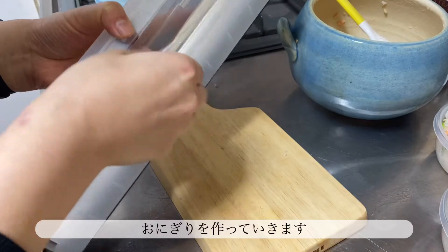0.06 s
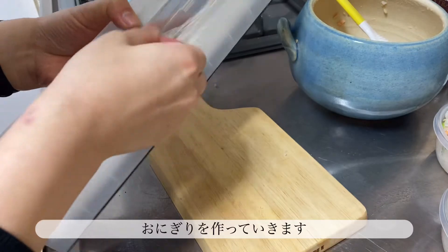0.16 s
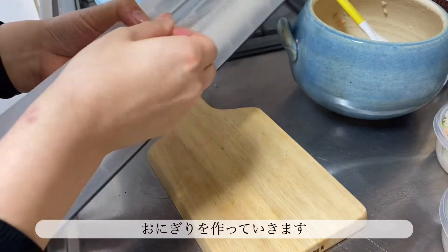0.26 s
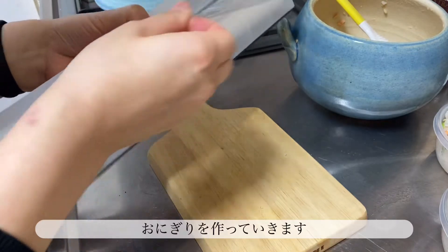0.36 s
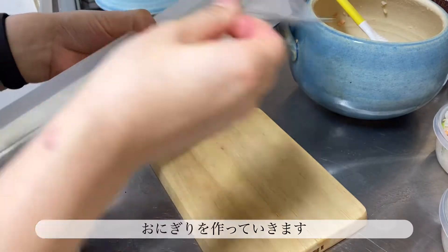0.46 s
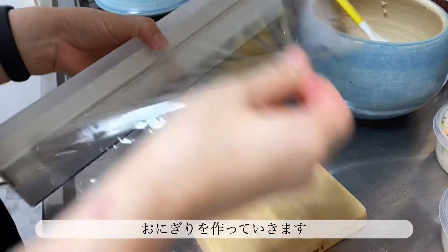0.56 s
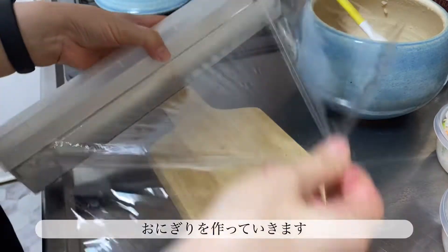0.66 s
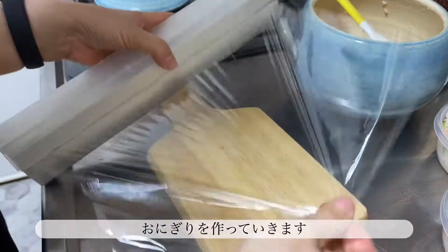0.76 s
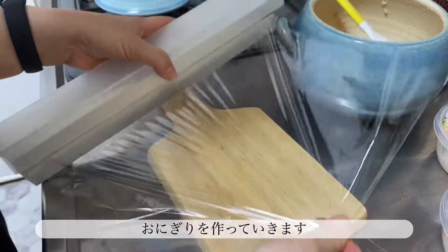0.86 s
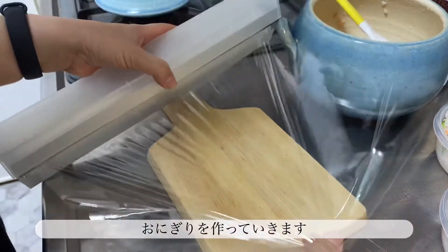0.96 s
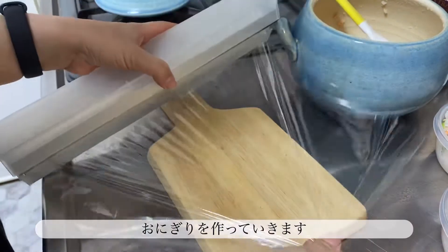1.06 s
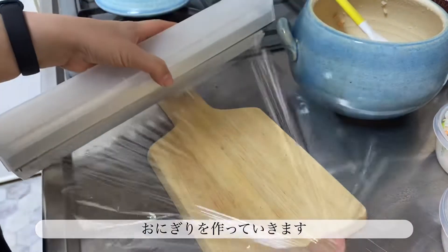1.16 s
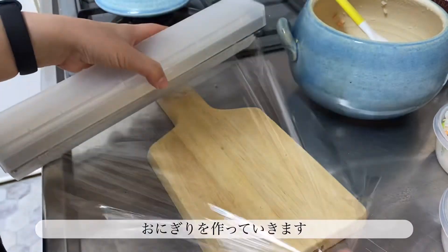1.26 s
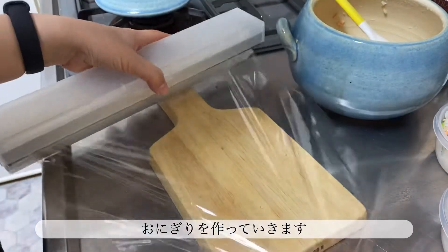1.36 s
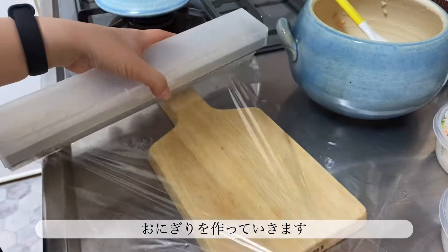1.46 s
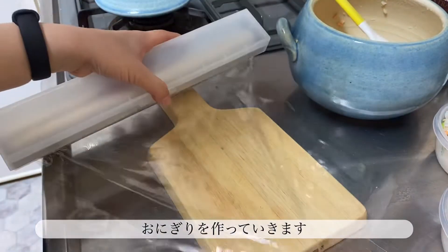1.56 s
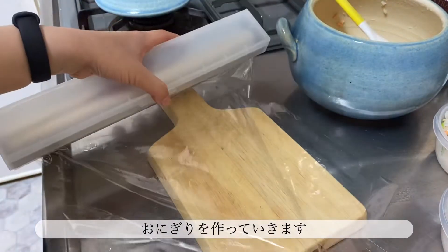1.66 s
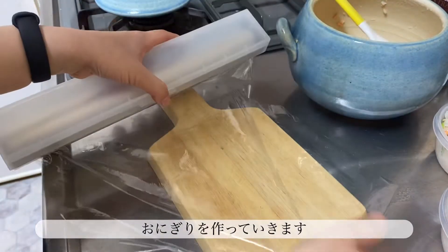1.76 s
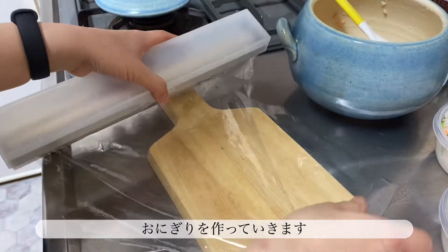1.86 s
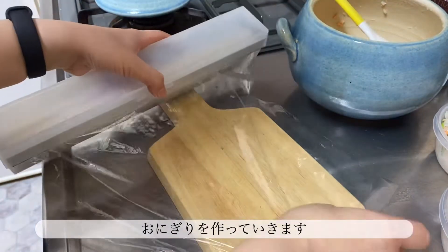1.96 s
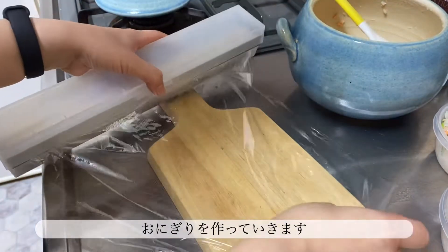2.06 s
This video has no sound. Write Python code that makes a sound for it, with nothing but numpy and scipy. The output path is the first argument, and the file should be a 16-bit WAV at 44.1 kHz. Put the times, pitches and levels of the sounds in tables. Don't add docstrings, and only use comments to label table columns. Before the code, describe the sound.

Thin plastic film crackles sharply as it is pulled off a roll in its rattling case

```python
import sys
import numpy as np
from scipy import signal
from scipy.fft import rfft, irfft
from scipy.io import wavfile
from scipy.ndimage import uniform_filter1d

SR = 44100
rng = np.random.default_rng(int(sys.argv[2]) if len(sys.argv) > 2 else 0)


def undo_db(level):
    steps = np.asarray(level, float) / 20
    return 10 ** steps


def unload_audio(sound):
    columns = np.transpose(np.atleast_2d(sound))
    steps = np.round(np.clip(columns, -1, 1) * 32767)
    wavfile.write(sys.argv[1], SR, steps.astype(np.int16))


N = 92610

# time in seconds, rattle level in dB, flap level in dB.
SHAKE = [(0, -63, -50.5), (.1, -81, -59), (.22, -67, -50), (.32, -55.5, -50), (.43, -45, -43.5),
         (.6, -81, -51), (.73, -37.5, -69), (.9, -66, -49.5), (.98, -47.5, -48), (1.07, -55.5, -59),
         (1.25, -41, -48.5), (1.4, -59, -43.5), (1.5, -55.5, -53.5), (1.56, -62.5, -55.5),
         (1.7, -70.5, -62.5), (2.1, -74, -61)]
# mode in Hz, level in dB, time to fall 60 dB in seconds.
ROLL_MODES = [(330, -14, .02), (420, -9, .025), (478, -1, .07), (530, -10, .015), (680, -8, .012),
              (820, -8, .012), (937, -8, .055), (1150, -7, .014), (1400, -8, .01), (1650, -6, .012),
              (1920, -5, .02), (2250, -8, .008), (2700, -7, .008)]
# mode in Hz, level in dB, time to fall 60 dB in seconds.
CASE_MODES = [(285, -8, 0.01), (450, -3.5, 0.024), (593, 2, 0.0093), (790, -18.5, .014),
              (909.5, -5.5, 0.069), (1030, -6.5, 0.01), (1093, -0.5, 0.014), (1420, -28, 0.0033),
              (1650, -3.5, .01), (2110, -10, 0.017), (2596, -10.5, 0.017)]


def evened(x):
    return x / np.sqrt(np.mean(x ** 2) + 1e-20)


def read(points, hz):
    f, value = np.transpose(points)
    return np.interp(np.log(hz + 1), np.log(f + 1), value)


def curve(table, column):
    rows = np.array(table)
    return np.interp(np.arange(N) / SR, rows[:, 0], rows[:, column])


def colour(x, points):
    log_gain = np.log(undo_db(read(points, abs(np.fft.fftfreq(8192, 1 / SR)))))
    taps = np.fft.ifft(np.exp(np.conj(signal.hilbert(log_gain)))).real[:4096]
    return signal.oaconvolve(x, taps)[:N]


def drift(hz):
    spectrum = rfft(rng.standard_normal(N))
    return evened(irfft(spectrum / (1 + (np.fft.rfftfreq(N, 1 / SR) / hz) ** 2), N))


def sparse(per_s, spread_db):
    draw = rng.random((N, 3))
    happens = draw[:, 0] < per_s / SR
    size_db = spread_db * np.minimum(-np.log(draw[:, 2] + 1e-9), 4)
    return happens * np.sign(draw[:, 1] - 0.5) * undo_db(size_db)


def add(mix, s, sound):
    part = mix[round(s * SR):][:len(sound)]
    part += sound[:len(part)]


def kitchen_hush():
    # frequency in Hz, level in dB.
    spectrum = [(18, -7), (30, -6.5), (165, 11), (239, 0.5), (486, 29), (2230, -68.5), (8520, -33),
                (11400, -27.5), (16000, -33)]
    return undo_db(-74.5) * evened(colour(rng.standard_normal(N), spectrum))


def crackle():
    # time in seconds, crackle level in dB.
    pull = [(0, -52), (.08, -56), (.1, -68), (.34, -49), (.4, -42), (.6, -37.5), (.645, -49), (.68, -36),
            (.82, -60.5), (.86, -71), (.93, -78.5), (1.02, -52), (1.07, -89), (1.23, -40.5), (1.33, -44.5),
            (1.38, -69.5), (1.5, -69.5), (2.1, -85)]
    # middle in seconds, half length in seconds, level in dB.
    rustles = [(0.798, 0.004, -45.5), (1.12, 0.0076, -45), (1.148, 0.02, -43.5), (1.188, 0.018, -48),
               (1.246, 0.018, -46), (1.308, 0.0098, -45), (1.463, 0.041, -71), (1.544, 0.033, -51.5),
               (1.768, 0.018, -62.5), (1.914, 0.081, -65.5), (2.065, 0.037, -67.5)]
    releases_per_s, spread_db, clump_db, hiss_db = 1500, 4.5, 2.5, -6
    grain_t60, shapes = 0.0078, 24
    t, now = np.arange(800) / SR, np.arange(N) / SR
    clump = undo_db(clump_db * drift(25))
    grains = np.zeros(N)
    for _ in range(shapes):
        grain = rng.standard_normal(800) * undo_db(-60 * t / grain_t60)
        grains += signal.oaconvolve(sparse(releases_per_s / shapes, spread_db), grain)[:N]
    level = undo_db(curve(pull, column=1))
    for s, half, db in rustles:
        level = level + undo_db(db) * np.exp(-((now - s) / half) ** 4)
    hiss = undo_db(hiss_db) * rng.standard_normal(N)
    return evened(clump * (evened(grains) + hiss)) * level


def snaps():
    # start in seconds, peak level in dB.
    releases = [(0.0483, -30), (0.0654, -40), (0.1585, -38), (0.4400, -18), (0.5255, -31), (0.5525, -21),
                (0.6160, -20), (0.6614, -23), (0.6774, -20), (0.682, -21), (0.7148, -30), (0.729, -29),
                (0.7956, -29), (0.8713, -46), (0.886, -51), (0.898, -50), (0.9348, -33), (0.9722, -39),
                (1.0015, -38), (1.0236, -29), (1.041, -28), (1.073, -35), (1.095, -40), (1.1014, -29),
                (1.1328, -21), (1.1603, -19), (1.2126, -21), (1.236, -25), (1.2565, -17), (1.3154, -30),
                (1.3224, -26), (1.4245, -46), (1.441, -50), (1.5183, -41), (1.5268, -36), (1.5474, -29),
                (1.6821, -48), (1.7444, -46), (1.7589, -42), (1.8916, -39), (2.0642, -46), (2.0827, -48)]
    level_db, rise_s, t60 = -1.5, 0.0015, 0.0091
    tail_db, tail_t60 = -14.5, 0.027
    out, t = np.zeros(N), np.arange(2000) / SR
    fall = undo_db(-60 * t / t60) + undo_db(tail_db - 60 * t / tail_t60)
    shape = fall * np.minimum(t / rise_s, 1)
    for s, db in releases:
        add(out, s, undo_db(db + level_db) * shape * rng.standard_normal(2000))
    return out


def film():
    # frequency in Hz, level in dB.
    bright = [(550, -2), (1200, 6.5), (3000, 3.5), (5000, 3), (8000, 5), (11000, 4.5), (14000, 3.5),
              (16000, 8)]
    shade_db = -3
    shaded = [(hz, db + shade_db * np.log2(hz / 4000)) for hz, db in bright]
    now = np.arange(N) / SR
    under_hand = (now > 0.2) * (now < 0.7)
    bed = undo_db(-0.6) * (crackle() + snaps())
    return colour(bed * under_hand, shaded) + colour(bed * (1 - under_hand), bright)


def flap():
    # frequency in Hz, level in dB.
    spectrum = [(20, -12), (40, -5.5), (62, 1.5), (130, -1), (220, -3.5), (400, -18.5), (1000, -48.5)]
    level_db, lump_db = -6.5, 6.5
    air = evened(colour(rng.standard_normal(N), spectrum))
    return air * undo_db(curve(SHAKE, column=2) + level_db + lump_db * drift(6.2))


def ring(modes, bright_db=0, deep_db=0):
    t, out = np.arange(SR // 4) / SR, 0
    for hz, db, t60 in modes:
        level_db = db + bright_db * (hz > 1300) + deep_db * (hz < 600)
        out = out + undo_db(level_db - 60 * t / t60) * np.sin(2 * np.pi * hz * t)
    return out


def blows(table, modes, level_db):
    detune, vary_db = 0.035, 3.0
    contact_s, chatter_db, chatter_s = 0.00025, -22.0, 0.0045
    thump_db, thump_turns = -1.0, 0.8
    out, t = np.zeros(N), np.arange(600) / SR
    for s, db, bright_db, deep_db, hz in table:
        spot = np.array(modes) * 1.0
        low_hold = np.minimum(spot[:, 0] / 1500, 1)
        spot[:, 0] *= 1 + detune * rng.standard_normal(len(modes)) * low_hold
        spot[:, 1] += vary_db * rng.standard_normal(len(modes))
        chatter = rng.standard_normal(600) * np.exp(-t / chatter_s) * np.minimum(t / contact_s, 1)
        push = (t == 0) + undo_db(chatter_db) * chatter
        body = ring(spot, bright_db, deep_db)
        u = t * hz / thump_turns
        thump = u * np.exp(1 - u) * np.sin(2 * np.pi * hz * t)
        thump = abs(body).max() * undo_db(thump_db) * thump
        body[:600] = body[:600] * (1 - np.exp(-t / contact_s)) + thump
        body = signal.fftconvolve(body, push)
        add(out, s, undo_db(db + level_db) * body / abs(body).max())
    return out


def rattle():
    swap_s = 0.85
    on_roll = np.clip((swap_s - np.arange(N) / SR) * 20, 0, 1)
    hits = evened(sparse(400, 1.5)) * undo_db(curve(SHAKE, column=1))
    out = np.zeros(N)
    for share, modes in ((on_roll, ROLL_MODES), (1 - on_roll, CASE_MODES)):
        body = ring(modes)
        out += signal.oaconvolve(hits * share, body / np.linalg.norm(body))[:N]
    return out


def roll_bumps():
    # start in seconds, peak in dB, extra brightness in dB, extra depth in dB, thump in Hz.
    bumps = [(0.110, -32, -5, 1, 1180), (0.116, -31.5, 13, -12, 410), (0.126, -30, 6, 1, 1015),
             (0.188, -32, -12, -5, 457), (0.197, -29, -13, -5, 1110), (0.209, -30.5, -20, 1, 473),
             (0.217, -31.5, -20, 16, 450), (0.233, -27.5, -11, 12, 468), (0.240, -28.5, -11, 6, 1140),
             (0.268, -38.5, 5, -17, 1790), (0.421, -24, 0, -2, 905), (0.4400, -9, -3.5, 1, 1710),
             (0.451, -21, 2, -20, 523), (0.526, -21, 2, -20, 594), (0.553, -10.5, -13, -10.5, 1950),
             (0.559, -18, -19, 7, 480), (0.573, -25, -12, -20, 950), (0.592, -9, -29, 0, 778),
             (0.600, -28, -10, -14, 1150), (0.616, -13, 13, -17, 1850), (0.620, -16, -18, -11, 556),
             (0.663, -20, 7.5, 15, 890), (0.681, -18.5, 30, -16, 422), (0.685, -21.5, 0, 9, 765),
             (0.695, -30, -25, 4, 460), (0.699, -20.5, -25, 6, 450), (0.722, -22.5, 13, -19, 793),
             (0.729, -28.5, -21, -19, 1050)]
    return blows(bumps, ROLL_MODES, -1.08)


def thuds():
    # start in seconds, peak level in dB, starting pitch in Hz.
    tugs = [
        (0.126, -36.5, 163),
        (0.442, -39.5, 125),
        (0.59, -36, 110),
        (0.681, -24, 244),
        (.745, -40, 194),
        (.785, -32.5, 250.5),
        (0.995, -45, 235),
        (1.33, -25.5, 209),
        (1.792, -44, 211),
    ]
    rise_s, t60, sag, sag_s, rough = 0.0081, 0.16, 0.6, 0.0334, 0.741
    out, t = np.zeros(N), np.arange(SR // 4) / SR
    for s, db, hz in tugs:
        wobble = evened(uniform_filter1d(rng.standard_normal(len(t)), 300))
        pitch = hz * (1 - sag * (1 - np.exp(-t / sag_s))) * np.exp(rough * wobble / 2)
        level = undo_db(db - 60 * t / t60) * np.minimum(t / rise_s, 1)
        add(out, s, level * np.sin(2 * np.pi * np.cumsum(pitch) / SR))
    return out


def case_knocks():
    # start in seconds, peak in dB, extra brightness in dB, extra depth in dB, thump in Hz.
    knocks = [(0.384, -33, -2, -2, 840), (0.784, -30.5, -23, -20, 890), (0.936, -34, -19, -22, 1860),
              (0.994, -29.5, -16, -12, 450), (1.000, -24, -9, -0.5, 753), (1.102, -39, 11, -1, 880),
              (1.137, -34, 10, -8, 910), (1.154, -26, -4, -30, 840), (1.162, -33.5, -21, -22, 840),
              (1.215, -34, 9, -13, 800), (1.244, -30.5, -2, -14, 940), (1.260, -40, 0, -6, 860),
              (1.294, -33, 12, -13, 850), (1.307, -36, -5, -27, 900), (1.328, -21, -14, 6, 880),
              (1.333, -27, -25, -8, 560), (1.532, -27, -7, 5, 930), (1.547, -35.5, -2, -3, 490),
              (1.789, -21, 4.5, -2, 796), (1.895, -45, -25, 8, 880)]
    return blows(knocks, CASE_MODES, 1)


def room(x):
    # frequency in Hz, time to fall 60 dB in seconds.
    decay = [(100, 0.34), (500, 0.15), (2000, 0.16), (6000, 0.12), (15000, 0.061)]
    taps = np.zeros((2, SR // 2))
    at = np.arange(120, SR // 2 - 20, 20) + rng.integers(0, 20, (2, (SR // 2 - 121) // 20))
    np.put_along_axis(taps, at, rng.choice([-1.0, 1.0], at.shape), 1)
    hz, t, z = signal.stft(taps, SR, nperseg=256)
    tail = signal.istft(z * undo_db(-60 * t / read(decay, hz)[:, None]), SR, nperseg=256)[1]
    return signal.fftconvolve(x[None], tail / np.linalg.norm(tail[0]), axes=1)[:, :N]


def turning_echoes(feed):
    turns_per_s = 3
    turn = 2 * np.pi * turns_per_s * np.arange(N) / SR
    return room(feed * np.sin(turn)) + room(feed * np.cos(turn))


def two_ports(direct, echoes):
    # frequency in Hz, phase in radians.
    lag = [(0, 0), (950, 1.1), (2070, 0.3), (3190, 1.3), (4820, 0.4), (7240, -0.5), (8100, -3.5),
           (8870, -3.6), (10400, -6.3), (11600, -6.5), (12600, -9.1), (14000, -9.6), (15200, -12.5),
           (16500, -12.5)]
    # frequency in Hz, level in dB.
    lean = [(60, -4.5), (240, -3), (950, 1.5), (3770, 2), (15000, 0.5)]
    shared_from_hz, shared_below_hz = 8000, 400
    hz, (lag_hz, phase) = np.fft.rfftfreq(2 * N, 1 / SR), np.transpose(lag)
    half = undo_db(read(lean, hz) / 2) * np.exp(0.5j * np.interp(hz, lag_hz, phase))
    a, b = rfft(echoes, 2 * N)
    same = 1 / (1 + (shared_from_hz / (hz + 1)) ** 8) + 0.7 / (1 + (hz / shared_below_hz) ** 4)
    same = np.clip(same, 0, 1)
    wet = np.array([a, same * a + np.sqrt(1 - same ** 2) * b])
    return irfft((rfft(direct, 2 * N) + wet) * np.array([half, 1 / half]))[:, :N]


def scene():
    hush = kitchen_hush()
    sheet = film()
    air = flap() + thuds()
    case = rattle() + roll_bumps() + case_knocks()
    case = signal.sosfilt(signal.butter(2, 330, "high", fs=SR, output="sos"), case)
    feed = undo_db(-9.0) * air + undo_db(-5.5) * case + undo_db(-3.5) * sheet
    return two_ports(case + sheet + air + hush, turning_echoes(feed))


def band_limit(x):
    return signal.sosfilt(signal.butter(12, 16980, fs=SR, output="sos"), x)


def record(dry):
    low_cut_hz, edge_hz, leak_db = 55, 15300, -32
    cut = signal.sosfilt(signal.butter(4, low_cut_hz, "high", fs=SR, output="sos"), dry)
    limited = signal.oaconvolve(cut, signal.firwin(255, edge_hz, fs=SR)[None], "same")
    mix = limited + undo_db(leak_db) * cut
    return band_limit(mix)


dry = scene()
out = record(dry)
unload_audio(out)
```